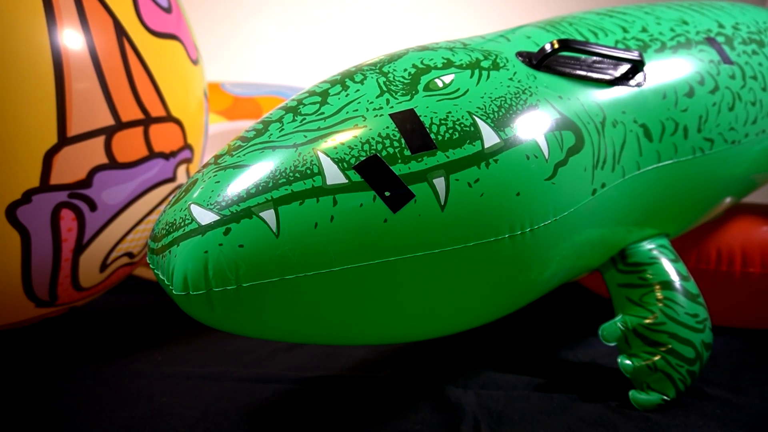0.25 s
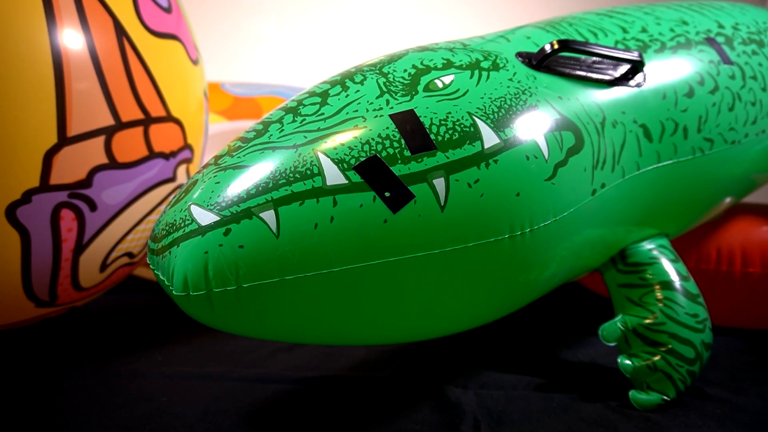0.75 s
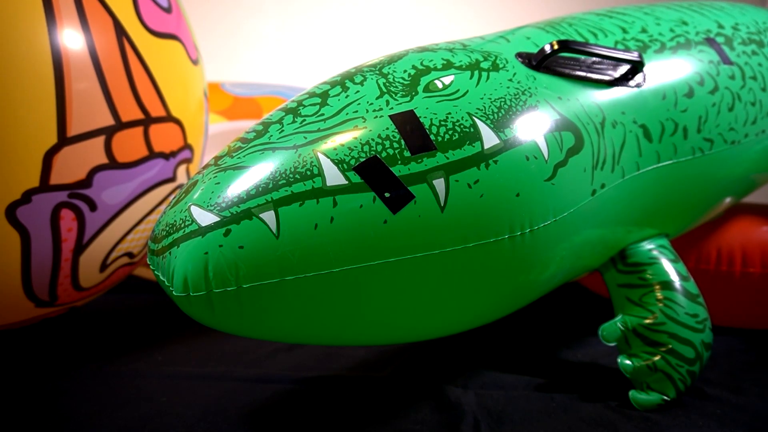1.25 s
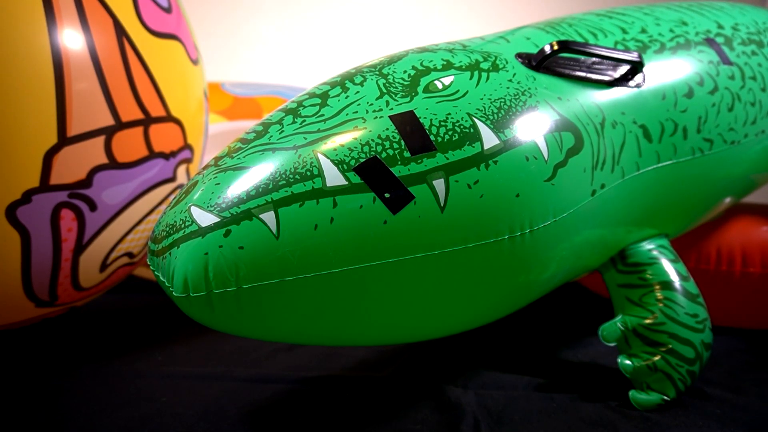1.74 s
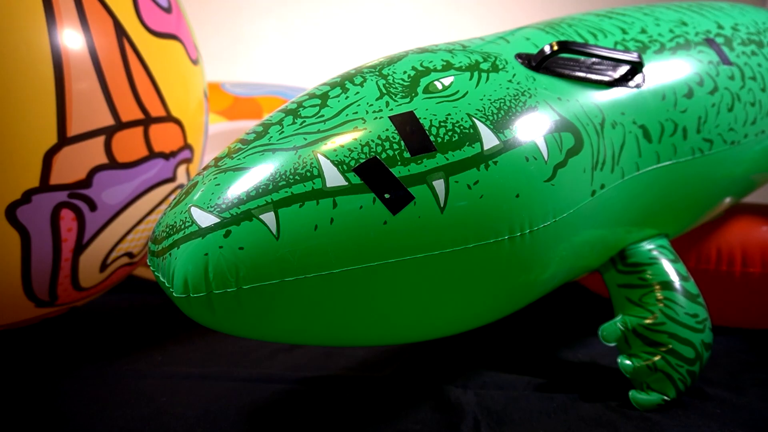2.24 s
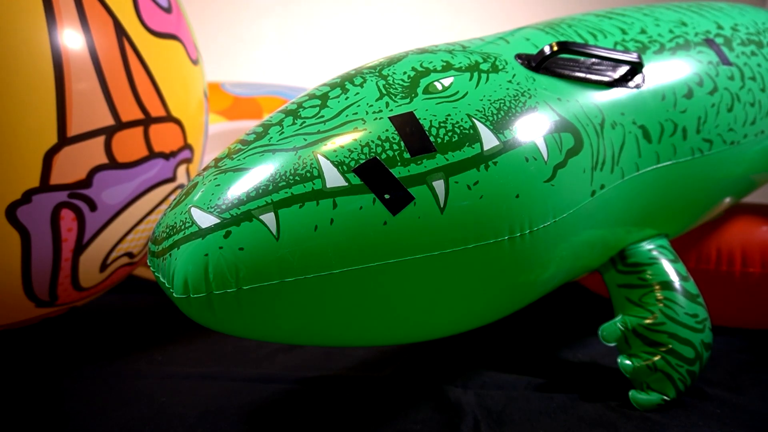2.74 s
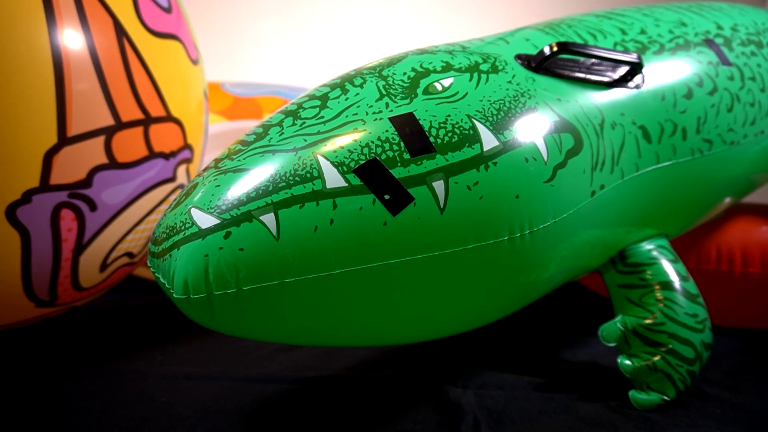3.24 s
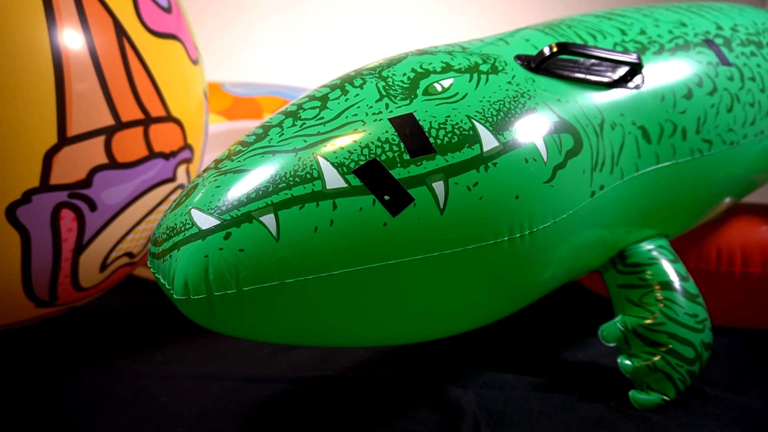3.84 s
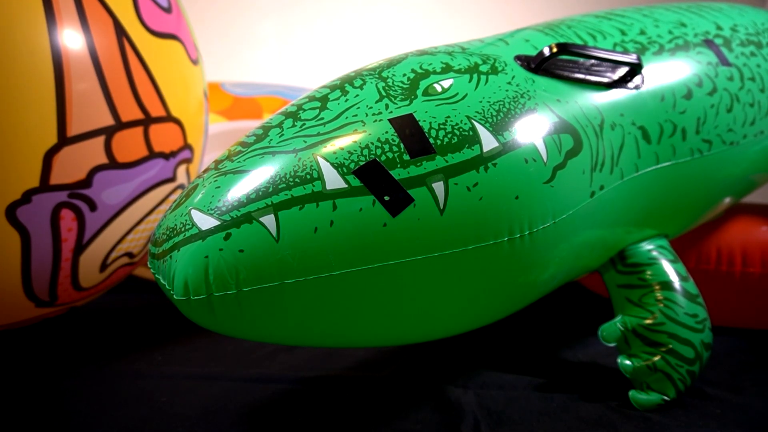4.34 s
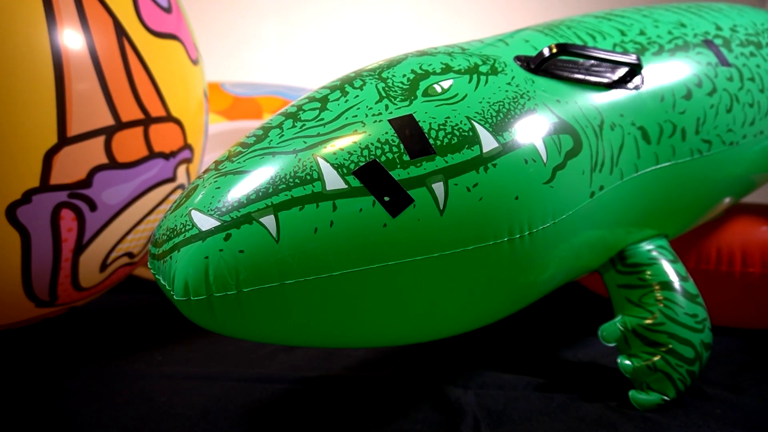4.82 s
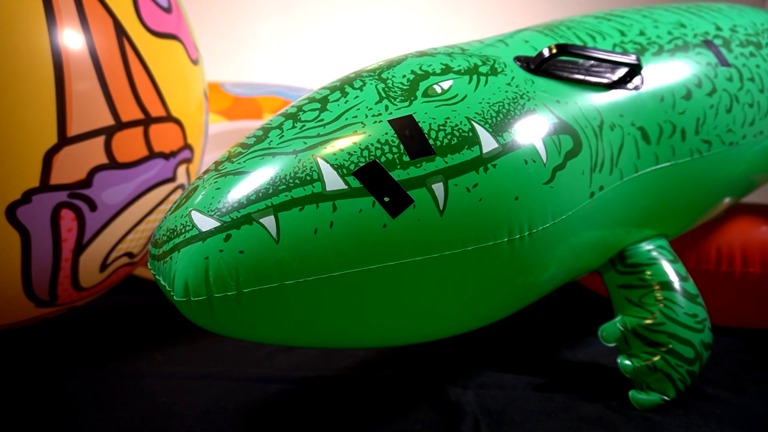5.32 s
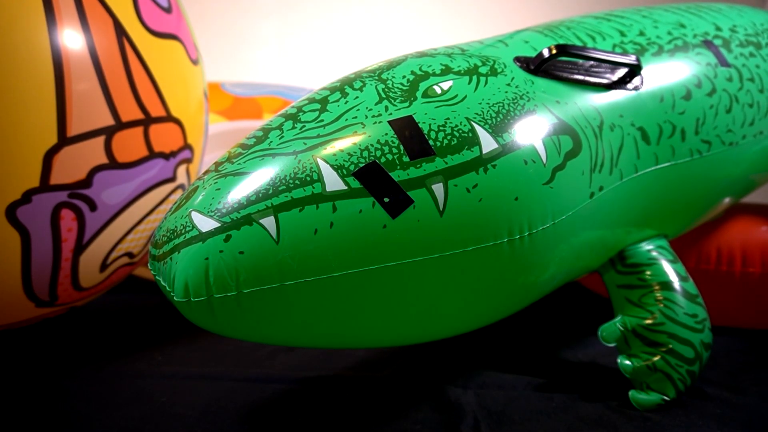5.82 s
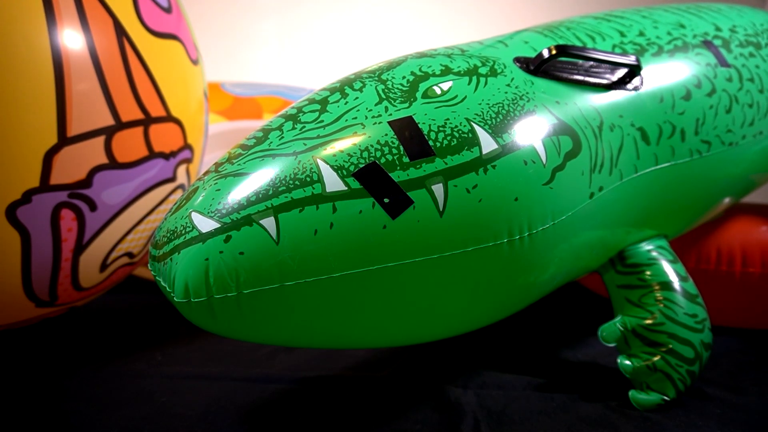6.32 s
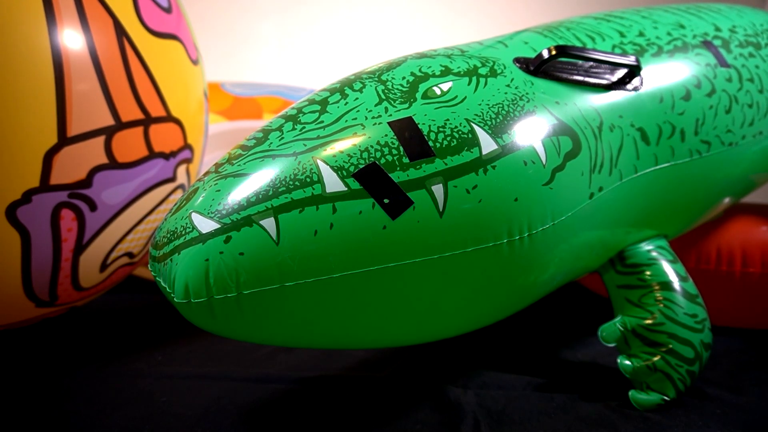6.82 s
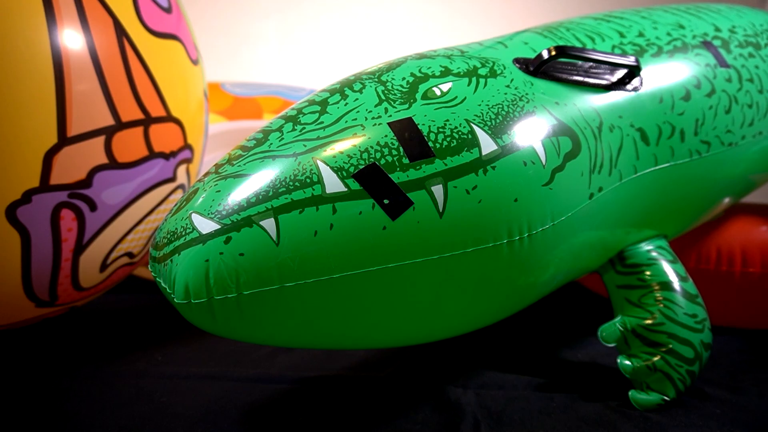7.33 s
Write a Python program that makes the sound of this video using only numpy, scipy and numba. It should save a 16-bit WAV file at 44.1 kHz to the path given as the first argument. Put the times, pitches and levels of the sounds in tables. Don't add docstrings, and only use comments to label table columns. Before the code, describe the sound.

Close, constant sharp hiss of a leaking inflatable, overlaid by rough low wind flutter, hard slaps and a brief thin whistle near the end.

```python
import sys
import numpy as np
from scipy import signal
from scipy.fft import rfft, irfft, next_fast_len
from scipy.io import wavfile
from scipy.ndimage import uniform_filter1d, map_coordinates
from numba import njit

SR = 44100
rng = np.random.default_rng(int(sys.argv[2]) if len(sys.argv) > 2 else 0)


def put_to_file(sound):
    columns = np.atleast_2d(sound).T
    safe = np.clip(columns, -1, 1)
    whole_steps = np.round(safe * 32767)
    wavfile.write(sys.argv[1], SR, whole_steps.astype(np.int16))


def amplitude_ratio(level_db):
    exponent = np.asarray(level_db, float) / 20
    return 10 ** exponent


N = 333837
T = np.arange(N) / SR


def evened(x):
    return x / np.sqrt(np.mean(x ** 2) + 1e-20)


def read(points, hz):
    f, value = np.transpose(points)
    return np.interp(np.log(hz + 1), np.log(f + 1), value)


def coloured(x, gain):
    size = next_fast_len(len(x))
    return irfft(rfft(x, size) * gain(np.fft.rfftfreq(size, 1 / SR)), size)[..., :len(x)]


def drift(hz):
    t = T[::32]
    noise = rfft(rng.standard_normal(len(t)))
    slow = noise * np.exp(-(np.fft.rfftfreq(len(t), t[1]) / hz) ** 2)
    return np.interp(T, t, evened(irfft(slow, len(t))))


def bumps(rows):
    t = T[::64]
    s, height, ms, *more = np.array(rows, float).T
    bells = np.exp(-.5 * ((t[:, None] - s) / (ms / 1000)) ** 2)
    return [np.interp(T, t, bells @ h) for h in [height] + more]


def capped(db, top_db):
    return np.where(db > 0, top_db * np.tanh(db / top_db), db)


def add(mix, s, sound):
    part = mix[max(round(s * SR), 0):][:len(sound)]
    part += sound[:len(part)]


# pitch_hz, level_db (rms)
MOTOR_LINES = [(1065, -84), (1228, -85), (1503, -84), (1826, -79), (1875, -78), (2579, -76), (2767, -73),
               (4970, -73), (5033, -68.5), (5221, -65.5), (5360, -72), (5551, -65), (5738, -65.5)]
# centre_s, lift_db, half_width_ms
STRONG_SWELLS = [(0, 5, 120), (.2, 3, 80), (.45, 12.5, 100), (.68, 10, 60), (2.1, 8, 170), (2.7, 8, 270),
                 (3.55, 5, 150), (4.15, 11, 350), (4.9, 5, 300), (6.3, 9.5, 330), (7.0, 8, 300),
                 (7.5, 5, 150)]
# centre_s, lift_db, half_width_ms
LOWER_LINE_SWELLS = [
    (.03, 9, 70),
    (.19, 9, 40),
    (.35, 7, 70),
    (4.3, 4, 500),
    (6.1, 6, 250),
    (6.6, 6, 150),
    (7.1, 5, 250),
]


def motor():
    lines = [(hz, db + 2.0 * drift(0.51)) for hz, db in MOTOR_LINES]
    lines.append((2395.5, -70 + bumps(STRONG_SWELLS)[0]))
    lines.append((2249, -72 + bumps(LOWER_LINE_SWELLS)[0]))
    out = np.zeros((2, N))
    for hz, db in lines:
        turn = 2 * np.pi * (np.cumsum(hz + 2.0 * drift(3.33)) / SR + rng.random())
        side = np.array([[0], [rng.normal(0, 0.2)]])
        out += np.sqrt(2) * amplitude_ratio(db) * np.sin(turn + side)
    return out


@njit
def whirl(noise, hz, width):
    out, a, b = np.zeros(len(noise)), 0j, 0j
    for n in range(len(noise)):
        r = np.exp(-np.pi * width[n] / SR)
        pole = r * np.exp(2j * np.pi * hz[n] / SR)
        a = pole * a + np.sqrt(1 - r * r) * noise[n]
        b = pole * b + (1 - r) * a
        out[n] = 2 * b.real
    return out


def whistle(hz, db, width, steady, broken_db, wander=0.0034):
    width_hz = np.clip(width + 0 * T, 4, 500)
    tone = whirl(rng.standard_normal(N), hz * (1 + wander * drift(4.0)), width_hz)
    envelope = abs(signal.hilbert(tone, next_fast_len(N))[:N])
    tone = tone / (envelope + 0.044) ** steady
    return amplitude_ratio(db + broken_db * drift(6.1)) * tone * amplitude_ratio([[.5], [-.5]])


def stretches(rows):
    edge_s = .02
    hz, gain = np.full(N, rows[0][2], float), np.zeros(N)
    for s, length, pitch_hz, glide, db in rows:
        on = (T >= s) & (T < s + length)
        hz[on] = pitch_hz + glide * (T[on] - s) / length
        edges = np.clip(np.minimum(T[on] - s, s + length - T[on]) / edge_s, 0, 1)
        gain[on] = np.maximum(gain[on], amplitude_ratio(db) * edges)
    return hz, gain


# start_s, length_s, pitch_hz, glide_hz, level_db
RIM_TONES = [(1.1, .45, 3400, 50, -63), (1.6, .6, 3540, 110, -61), (2.35, .25, 3430, 20, -61),
             (4.05, .5, 3480, -220, -61), (4.55, .2, 3400, 280, -61), (4.75, .35, 3040, 120, -61),
             (5.15, .2, 3280, 200, -57), (5.36, .16, 3380, 60, -58), (5.5, .22, 3065, 20, -55),
             (5.74, .18, 3130, 20, -64), (6.0, .35, 3150, 110, -60), (6.3, .45, 3170, 300, -60),
             (6.8, .28, 3350, -150, -58), (7.08, .1, 2970, 100, -51), (7.28, .14, 3190, 0, -62)]
# start_s, length_s, pitch_hz, glide_hz, level_db
HIGH_RIM_TONES = [(1.1, .2, 4620, -60, -58), (1.3, .25, 4540, -20, -62), (1.9, .3, 4850, 60, -61),
                  (2.4, .15, 4600, 0, -61), (4.06, .1, 4080, 0, -59), (4.5, .25, 4580, 20, -62),
                  (4.8, .12, 4500, 30, -60), (5.0, .15, 4920, 0, -59), (5.15, .4, 4520, 60, -59),
                  (6.0, .13, 4480, 60, -57), (6.2, .15, 4360, 60, -60), (6.4, .2, 4850, 0, -61),
                  (7.0, .3, 4000, 40, -58)]


def loose_whistles():
    hz, gain = stretches(RIM_TONES)
    low = gain * whistle(hz, 0, 75.0, .45, broken_db=1.4)
    hz, gain = stretches(HIGH_RIM_TONES)
    return low + gain * whistle(hz, 0, 105.0, .3, broken_db=1.5)


# start_s, length_s, pitch_hz, glide_hz, level_db
LOCKED_TONES = [
    (6.4, .14, 3860, 0, -59),
    (6.64, .08, 3745, 0, -42),
    (6.69, .12, 3750, -10, -45.5),
    (6.79, .158, 3725, -35, -43),
    (6.95, .04, 3690, -10, -46),
    (6.98, .06, 3615, -20, -50),
    (7.02, .08, 3585, -35, -50.5),
    (7.12, .18, 3540, -60, -53),
]


def locked_whistle():
    firm_db, blur = -45, .9
    hz, gain = stretches(LOCKED_TONES)
    width = 11.0 * np.maximum(amplitude_ratio(firm_db) / (gain + 1e-6), 1) ** blur
    return gain * whistle(hz, 0, np.minimum(width, 60), .68, broken_db=1.0, wander=.0012)


# centre_s, lift_db, half_width_ms
SKIN_SWELLS = [(.1, 3, 60), (.35, 4, 120), (.57, 7, 25), (.7, 9, 40), (3.83, 6, 50), (4.15, 6.5, 110),
               (4.78, 5, 100), (5.5, 6, 120), (6.25, 8, 100), (6.75, 7, 130), (7.35, 6, 120)]


def skin_hum():
    return whistle(2110, -66 + bumps(SKIN_SWELLS)[0], 50.0, .3, broken_db=.8)


# frequency_hz, coherence
LIKENESS = [(800, 0.13), (1400, 0.2), (3100, 0.36), (6800, 0.7), (15000, 0.92)]
# frequency_hz, left_minus_right_db
BALANCE = [(60, -3), (180, -4), (550, 2.5), (1650, -0.5), (4970, 0.5), (15000, 2)]


def spread(a, b):
    def same(f):
        return np.clip(read(LIKENESS, f), -1, 1)
    right = coloured(a, same) + coloured(b, lambda f: np.sqrt(1 - same(f) ** 2))
    left = coloured(a, lambda f: amplitude_ratio(read(BALANCE, f) / 2))
    return np.array([left, coloured(right, lambda f: amplitude_ratio(-read(BALANCE, f) / 2))])


# frequency_hz, density_db (per Hz)
HISS = [(530, -108), (900, -37), (1100, -28.5), (1740, -22.5), (2310, -21), (2600, -17.5), (3640, -13),
        (4150, -13.5), (6530, -7.5), (7710, -2.5), (9680, -3), (10600, -4.5), (13500, 1.5), (15600, 0)]
# time_s, level_db
JET_PRESSURE = [(0, 0.5), (.6, 0.5), (1.2, 1), (1.9, 0.5), (2.6, 0.5), (3.15, 0.5), (3.5, -0.5),
                (4.25, 0.5), (4.8, -0.5), (5.4, 0.5), (5.9, 0), (6.4, 0), (7.0, 1), (7.57, 1.5)]
# frequency_hz, width_hz, level_db
SKIN_MODES = [(2300, 220, -63), (1870, 110, -71), (7700, 310, -51.5), (9730, 1000, -43), (11630, 810, -43),
              (13700, 430, -49), (15400, 320, -44.5), (4550, 36, -61.5)]


def jet():
    frames = N // 128 + 8
    a, b, c, d, patches = rng.standard_normal((frames, 257, 5)).T
    patches = evened(uniform_filter1d(uniform_filter1d(patches, 8, 0), 30, 1))
    z = np.array([a + 1j * b, c + 1j * d]) * amplitude_ratio(0.62 * patches)
    raw = evened(signal.istft(z, nperseg=512, noverlap=384)[1][:, :N])
    white_db = 10 * np.log10(SR / 2)

    def modes(f):
        power = 0
        for m, w, db in SKIN_MODES:
            peak = amplitude_ratio(db + white_db) ** 2 / (w * np.pi / 2)
            power = power + peak / (1 + (2 * (f - m) / w) ** 2)
        return power

    grid = np.fft.rfftfreq(4096, 1 / SR)
    jet_db = -33.2
    scale = amplitude_ratio(jet_db) ** 2 / np.mean(amplitude_ratio(read(HISS, grid)) ** 2 * (grid < 15700))
    pair = [coloured(x, lambda f: np.sqrt(scale * amplitude_ratio(read(HISS, f)) ** 2 + modes(f))) for x in raw]
    s, pressure_db = np.transpose(JET_PRESSURE)
    return spread(*pair) * amplitude_ratio(np.interp(T, s, pressure_db) + 0.35 * drift(30.0))


# frequency_hz, phase_rad
LEFT_LEAD = [(10, .1), (50, .4), (100, .72), (200, 1.4), (330, 1.85), (600, 2.0), (900, 2.15)]
# frequency_hz, left_minus_right_db
LEFT_TILT = [(100, 0), (380, -1.0), (700, -2)]


def ports(x):
    def half(f):
        return amplitude_ratio(read(LEFT_TILT, f) / 2) * np.exp(.5j * read(LEFT_LEAD, f))

    def notch(f):
        return 1 - 0.45 * np.exp(-((f - 170) / 14.0) ** 2)
    return np.array([coloured(x, lambda f: notch(f) * half(f)), coloured(x, lambda f: notch(f) / half(f))])


# frequency_hz, density_db (per Hz)
EDDY_SPECTRUM = [(15, -8), (30, -12), (60, -1), (100, -1), (150, -5), (220, -9), (300, -16), (420, -28),
                 (600, -55.5)]


def swept(speed):
    train = evened(coloured(rng.standard_normal(3 * N // 2), lambda f: amplitude_ratio(read(EDDY_SPECTRUM, f))))
    train = evened(train / (uniform_filter1d(train ** 2, size=2400) + .05) ** .3)
    place = np.cumsum(speed)
    place = place - 4.46 * map_coordinates(train, [place], order=1, mode="wrap")
    push = map_coordinates(train, [place], order=3, mode="wrap")
    push = evened(push / (uniform_filter1d(push ** 2, size=900) + .05) ** .2)
    push = evened(push * (uniform_filter1d(push ** 2, size=450) + .05) ** .2)
    return evened(push + .025 * push ** 3 - .03 * (push ** 2 - 1))


def eddy(ms):
    u = (np.arange(1400) - 400) / SR / (ms / 4000)
    return (1 - u ** 2 - .5 * u) * np.exp(-u ** 2 / 2)


def cusp(ms):
    u = abs(np.arange(800) - 400) / SR / (ms / 1000)
    return (1 - .5 * u) * np.exp(-u) * (1 + u)


# centre_s, lift_db, half_width_ms, quickening_db
GUST_BELLS = [(0.072, -2, 8.1, 8.5), (0.166, 7, 7.9, -1.28), (0.204, 5.5, 27.5, -2.5), (0.323, 9, 9.7, -1),
              (0.744, 15, 13.9, 5), (1.205, 13, 9.9, -2.5), (1.309, 4, 7.1, -1.5), (1.375, 22, 7.6, -9.5),
              (1.503, 8.5, 13.4, -0.39), (1.533, -3.5, 42, -1.66), (1.558, 18, 7.4, -1), (1.76, 8, 27, 9.5),
              (1.92, 3.5, 16.2, 5.0), (2.079, 9.5, 35.2, -10.5), (2.229, 9, 12.3, 1.0),
              (2.319, -1, 9.7, 4.0), (2.403, 1, 7.05, -0.2), (2.436, 1, 20.9, -8), (2.598, 0.5, 14, 9),
              (2.708, 12, 7.8, -10.5), (2.889, 5.5, 7, 0.32), (3.041, 2.5, 27.7, 0.93), (3.255, 4, 18.1, 9),
              (3.386, 7.5, 32.5, 3.5), (3.598, 6.5, 10, -1.52), (3.68, 1.5, 34.3, 11.5),
              (3.73, 7.5, 8.7, -4), (3.867, 5.5, 10.9, -12), (3.987, 2, 32, -4.5),
              (4.212, 2.5, 7.46, -0.84), (4.236, 4, 11.6, 8), (4.346, 11.5, 9.2, 5.5),
              (4.424, 0.5, 28.2, 2.0), (4.47, 6.5, 10.1, 1), (4.576, 2, 15.6, 3.5),
              (4.773, 6.5, 15.5, -6.5), (4.825, 0.2, 35, 5.5), (4.969, 7, 7.5, -6), (5.422, 8.5, 11.1, 2.5),
              (5.525, 9.5, 12.7, 2.5), (5.731, 3, 31.6, -1.5), (5.857, 4, 17.2, 2.5),
              (5.946, 11, 8.25, 1.17), (6.264, 1.5, 14.8, -8), (6.381, 4.5, 13.6, -3.5),
              (6.711, 2.5, 25, -7.5), (6.733, 5, 6.3, 3), (6.832, 5.5, 13.7, 0.5), (7.369, 5.5, 6.4, 5),
              (7.497, 8.5, 19, -5)]
# centre_s, lift_db, half_width_ms, quickening_db
LULL_BELLS = [(0.126, -6, 13, 8), (0.375, -2.5, 12.4, 7), (0.507, -25, 10, 0.0), (0.605, -14.5, 10.9, 5.5),
              (0.906, -2, 9.9, 5), (1.044, 0, 20.6, -5.5), (1.165, -8, 8.1, -2.5), (1.337, -28, 4.8, 0.0),
              (1.397, -11, 9.3, -4.5), (1.441, -1.5, 25.3, 6.5), (1.475, -19, 6.5, 0.02),
              (1.622, -19, 12.3, -4), (1.892, -20, 13.4, 3), (2.033, -14, 7.2, 0.5), (2.169, -6, 26.7, -9),
              (2.526, -1.5, 24.5, 4), (2.664, -20, 9.3, 6.5), (2.74, -2.5, 13.3, -8.5),
              (2.937, -9, 14.5, -9.5), (3.464, -8.5, 10.25, 4.5), (3.536, -4, 7.35, -2.5),
              (3.638, -5.5, 10, -0.25), (3.783, -5, 13.8, -0.13), (3.907, -11, 10.02, -2),
              (4.067, -12, 10.5, 1.15), (4.167, -5.5, 24.7, 1), (4.292, -13, 16.3, 2), (4.388, -3, 11.4, 8),
              (4.643, -8, 21, -5.0), (4.921, -8.9, 23, -2.5), (5.033, -0.5, 33, 10.5), (5.053, -24, 6, -3),
              (5.108, -6, 23.6, -4), (5.21, -6, 29.3, -0.18), (5.26, -28, 4.95, -5),
              (5.344, -8, 20.7, -1.08), (5.629, -7, 9.7, -9), (5.974, -7.5, 9.7, 5),
              (6.036, -3, 23.4, -9.5), (6.104, -26, 9.1, -3.5), (6.208, -10, 19, -6.5),
              (6.447, -10, 24, -3), (6.557, -11, 34, -6.5), (6.639, -7.5, 11.3, -0.9),
              (6.773, -4, 15.6, -5.5), (6.906, -9, 10.4, 1.5), (7.0, -3, 14.6, -4.5),
              (7.188, -2.5, 30.7, 1), (7.24, -2.5, 8.3, 4.5), (7.423, -8.5, 15.9, -3.5)]
# centre_s, lift_db, half_width_ms, quickening_db
EARLY_FLURRIES = [(0.0, 7.5, 8.9, 1.0), (0.245, -6.5, 8.6, 7.5), (0.353, -7, 7.5, -4),
                  (0.445, 4.5, 6.1, 1.47), (0.473, -9, 13.4, 8), (0.585, 1, 6, -8.5), (0.625, 4.2, 7.9, 7),
                  (0.653, 1, 7.4, -10), (0.948, 7, 6.8, -1.1), (0.988, -7, 9.8, 16.5),
                  (1.117, -2.8, 21, 10.5), (1.237, 11.5, 5.4, 6), (1.281, 0, 6.8, 4.5),
                  (1.664, -7, 6.6, -4), (1.972, -9, 8.2, -5), (2.101, -7.5, 8.1, 10.5), (2.207, 4, 9.3, -7),
                  (2.363, -3, 6, -7), (2.476, -12, 6.8, 2.5), (2.636, -1, 8.3, 3.5),
                  (2.686, 4.5, 8.95, 5.0), (2.776, 2, 8.9, -0.37), (2.953, -4, 9.5, 6),
                  (3.169, 1, 7.8, 5.0), (3.281, -4, 6.9, 6), (3.332, -18, 7.6, 5),
                  (3.426, -6.5, 11.4, -8.5), (3.759, -6, 8.1, -7), (3.819, -3, 11.8, -7.5),
                  (3.925, -0.5, 8, 7.5)]
# centre_s, lift_db, half_width_ms, quickening_db
LATER_FLURRIES = [(4.101, 0, 33.8, -14), (4.256, 0, 6.3, 8.5), (4.32, 1.0, 8.2, 8.5), (4.45, -8, 7.6, 6),
                  (4.5, -6, 11.2, -8.5), (4.697, -1, 8.5, -6.5), (4.885, -5, 9.55, -9), (5.16, -4, 9.1, 9),
                  (5.296, 3, 9.4, 6.5), (5.374, -2, 7.5, -6.5), (5.438, -5.5, 11.7, -10.5),
                  (5.486, -2, 8, 6.5), (5.587, -15, 9.8, 12), (5.661, 4.5, 7.3, -4), (5.699, -8, 8.3, 13.5),
                  (5.811, 2.5, 8.2, -6.5), (6.064, -2.5, 9.3, 6), (6.16, -2.2, 8.1, 5),
                  (6.328, -0.3, 9.4, 7.5), (6.421, 4.5, 6.5, -6.0), (6.517, 3.5, 9.06, 6.5),
                  (6.605, 7.5, 7.9, 6), (6.872, 1.5, 21, -7), (7.054, 7, 7.06, 2), (7.162, -3, 8.1, -8.5),
                  (7.267, 2.5, 7, -11.5), (7.321, 3.5, 11.4, -5), (7.351, -7.5, 8, 3.5),
                  (7.449, -2, 10, 9.5), (7.569, 1, 28.7, 2)]
# time_s, peak_db, length_ms
HARD_EDDIES = [(0.068, -8, 4.1), (0.133, -20, 3.9), (0.238, -4, 4.9), (0.476, -19, 4.5),
               (0.534, -26.5, 6.2), (0.745, -11, 4.5), (0.98, -18, 3.6), (1.127, -14, 4.2),
               (1.547, -22, 2.4), (1.748, -14, 4.8), (2.316, -11, 4.34), (2.392, -24.5, 6.5),
               (2.594, -14, 3.9), (2.681, -26.5, 4.3), (5.587, -11, 4.04), (3.224, -11.5, 3.85),
               (3.256, -15, 4.16), (3.334, -22, 3.9), (3.667, -10.5, 3.35), (3.981, -26.5, 3.3),
               (4.24, -9, 3.67), (4.399, -14, 4.64), (5.003, -25.5, 3.52), (5.293, -23, 4.37),
               (5.506, -13.5, 3.7), (5.701, -10.5, 3.62), (5.846, -10, 5.4), (5.934, -22, 3.5),
               (7.051, -31.5, 12.4), (7.452, -14, 4.6)]


def air_flow():
    bells = list(GUST_BELLS) + list(LULL_BELLS) + list(EARLY_FLURRIES) + list(LATER_FLURRIES)
    lift_db, quick_db = bumps(bells)
    gust = capped(drift(44.3), 2.123)
    spurt_db = np.zeros(N)
    for s, db, ms in HARD_EDDIES:
        add(spurt_db, s - .006, np.clip(db + 34, 0, 13) * np.hanning(900))
    speed_db = .3 * quick_db + 0.1477 * gust + .1 * drift(17.02) + .06 * spurt_db
    force_db = 1.28 * lift_db + 0.066 * spurt_db + 3.54 * gust + 0.26 * drift(31.0)
    force = amplitude_ratio(-20.0 + capped(force_db, 15))
    return amplitude_ratio(capped(speed_db, 4.5)), np.hypot(force, amplitude_ratio(-34))


# time_s, peak_db
QUICK_EDDIES = [(0.066, -36), (0.616, -41), (0.729, -24.5), (.745, -21), (.874, -34.5), (.935, -38),
                (0.984, -41), (1.096, -35.5), (1.207, -41), (1.548, -29), (2.595, -33.5), (3.041, -37.5),
                (3.224, -32), (3.379, -40), (3.666, -32), (3.676, -31), (3.986, -31.5), (4.205, -44),
                (4.335, -36), (4.835, -36), (5.016, -38), (5.508, -33), (5.585, -37.5), (5.7, -34),
                (5.843, -34.5), (6.323, -35), (6.724, -36), (6.829, -42), (7.045, -38.5), (7.449, -43)]


def draught():
    speed, force = air_flow()
    limit = 0.41
    low_hz, top_hz = 35.7, 593

    def mesh(f):
        return f / np.hypot(f, low_hz) / np.sqrt(1 + (f / top_hz) ** 6)
    out = coloured(limit * np.tanh(force * swept(speed) / limit), mesh)
    for s, db, ms in HARD_EDDIES:
        add(out, s - .0045, amplitude_ratio(min(db, -14) + 6.5) * eddy(max(ms, 3)))
    for s, db in QUICK_EDDIES:
        spike = amplitude_ratio(db + 22.0) * cusp(1.0) + amplitude_ratio(db - 35.0) * cusp(0.059)
        add(out, s - .008, rng.choice([-1, 1]) * spike)
    private = np.array([swept(speed), swept(speed)])
    return ports(out) + amplitude_ratio(-18.5) * force * private


def scene():
    return motor() + loose_whistles() + locked_whistle() + skin_hum() + jet() + draught()


# time_s, depth_db
GAIN_KICKS = [(0.067, 4.9), (0.218, 2.5), (0.731, 9.0), (1.202, 4.4), (1.431, 1.7), (1.496, 2.7),
              (1.694, 2.0), (2.043, 1.6), (2.22, 3.1), (2.312, 1.5), (2.696, 3.5), (3.052, 4.0),
              (3.224, 4.3), (3.467, 1.6), (3.675, 7.8), (4.207, 2.8), (4.336, 2.9), (4.961, 1.9),
              (5.508, 3.3), (5.701, 3.8), (5.85, 2.4), (5.933, 3.1), (6.471, 1.4), (6.725, 3.8),
              (6.834, 1.6), (7.047, 2.2), (7.36, 1.6), (7.483, 2.3)]


def gain_control(dry):
    kicks = np.zeros(N)
    for s, db in GAIN_KICKS:
        kicks[round(s * SR)] = db
    t = np.maximum(T[:SR] - .022, 0)
    creep = 0.64 * np.exp(-t / 0.054) + 0.25 * np.exp(-t / 0.26)
    duck_db = uniform_filter1d(signal.oaconvolve(kicks, creep)[:N], size=110)
    return dry / amplitude_ratio(duck_db)


def band_limit(x):
    return signal.sosfilt(signal.butter(12, 15755, fs=SR, output="sos"), x)


def record(dry):
    ceiling = .8
    mix = ceiling * np.tanh(gain_control(dry) / ceiling)
    return band_limit(mix)


dry = scene()
out = record(dry)
put_to_file(out)
```